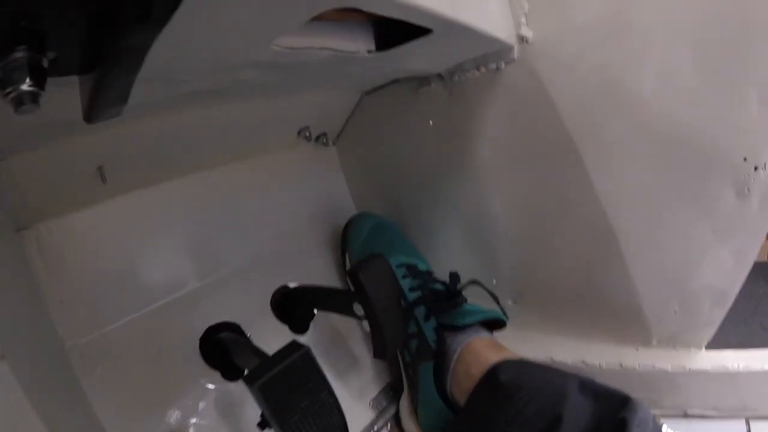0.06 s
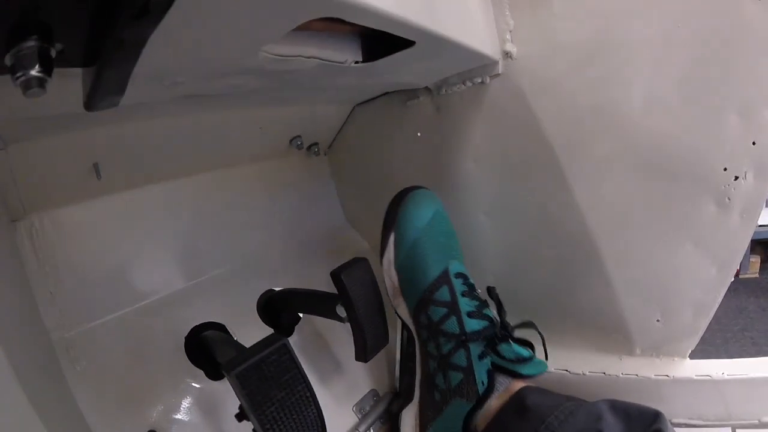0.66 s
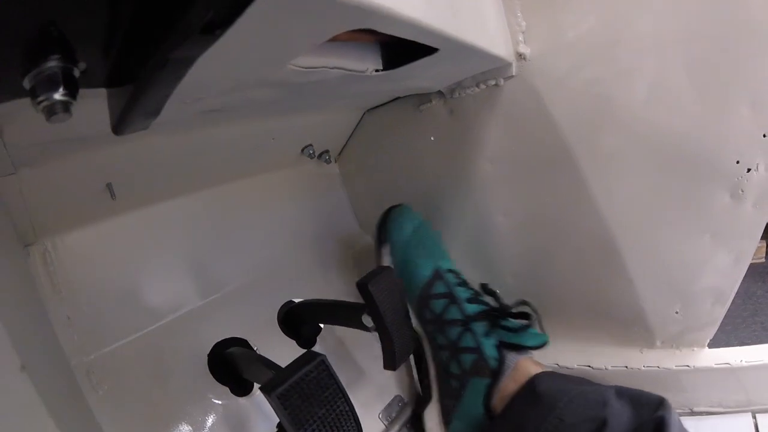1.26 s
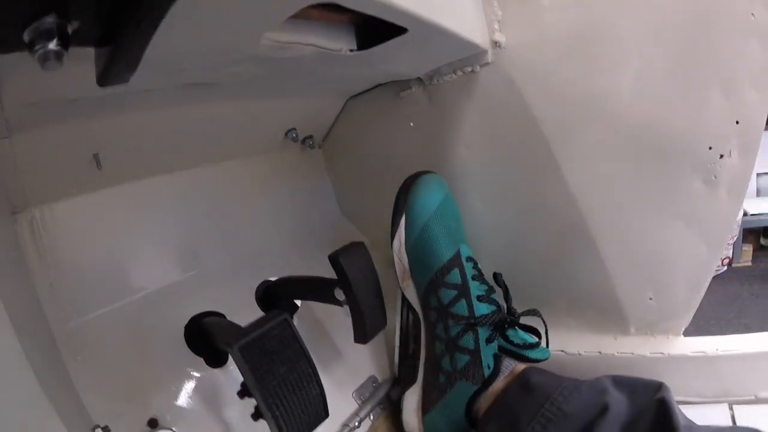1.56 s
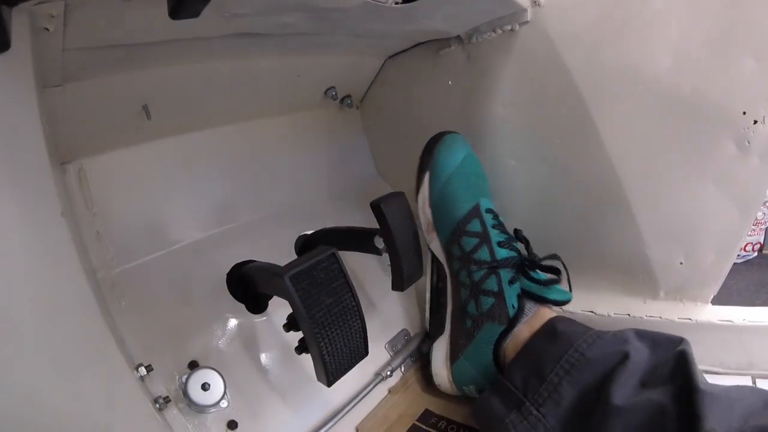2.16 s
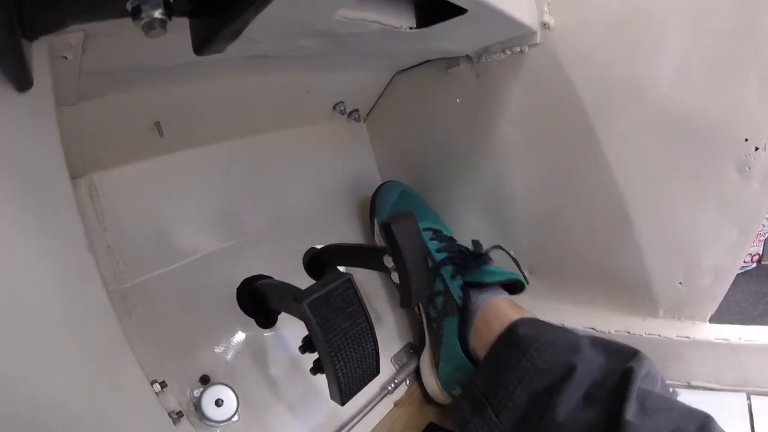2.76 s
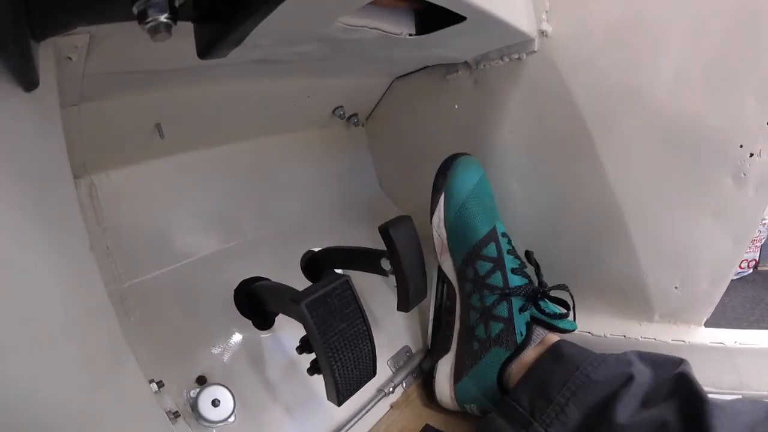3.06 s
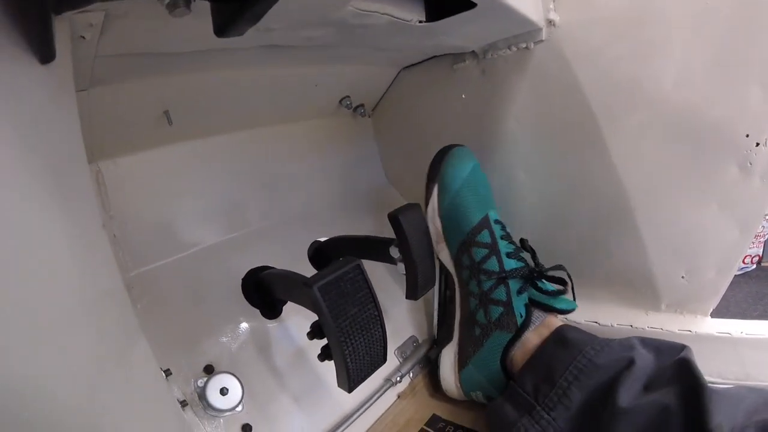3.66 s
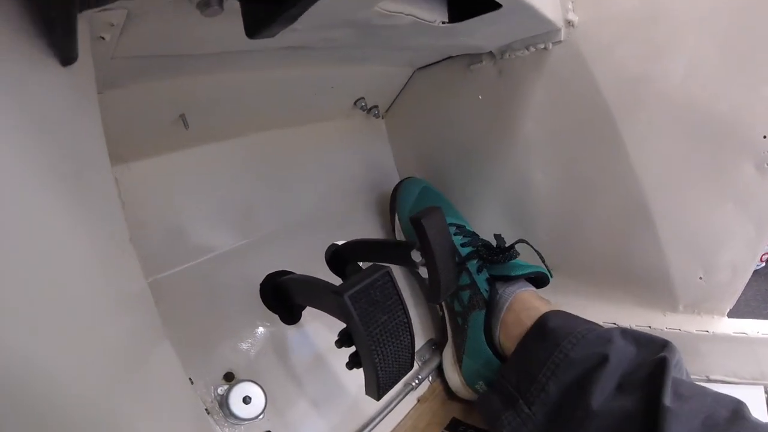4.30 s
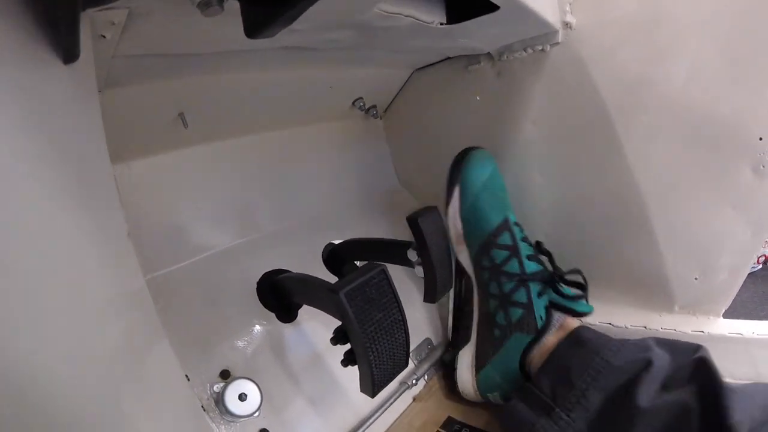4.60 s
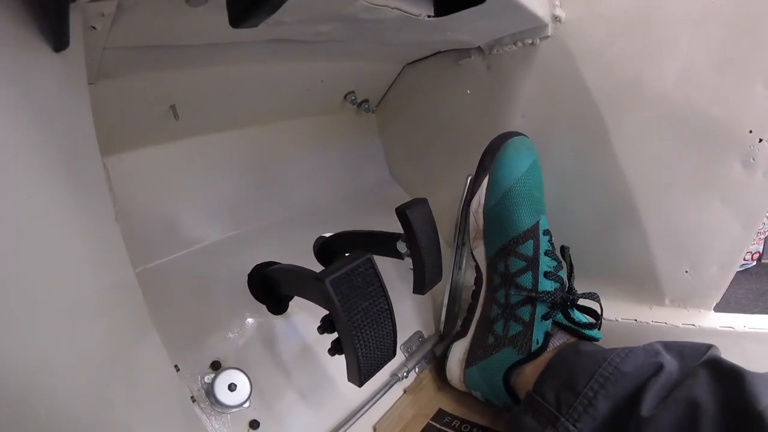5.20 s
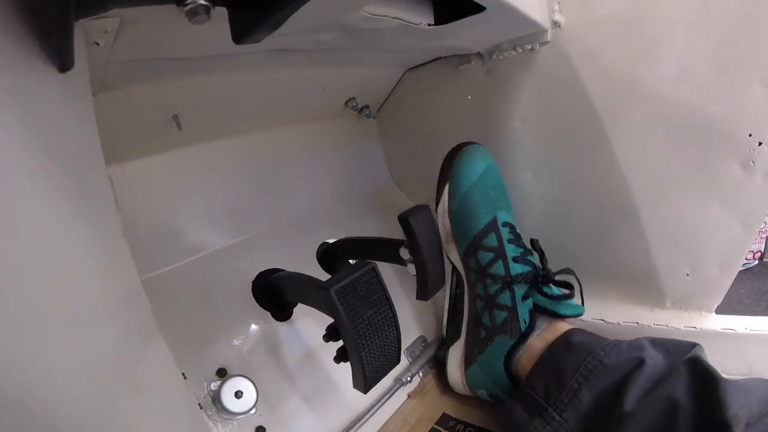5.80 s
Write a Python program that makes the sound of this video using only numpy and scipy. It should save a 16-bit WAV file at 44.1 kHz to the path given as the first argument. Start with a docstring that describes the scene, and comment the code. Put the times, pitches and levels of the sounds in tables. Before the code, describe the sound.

Close up in a bare metal car footwell, an accelerator pedal is pumped with irregular dull thumps and springy return thuds, the loudest near the start and at the end. A few sharper linkage clacks cut in, and the panels resonate briefly. Between blows come soft cable drag, trouser rustle, small ticks and short rubber scuffs, over faint microphone rumble and hiss with only a trace of garage echo.

```python
"""A garage, in the bare sheet-metal footwell of a standing car: a foot works the throttle pedal.
Again and again the sole thumps down, trouser cloth and cable rub, and the spring pulls the pedal back
with a thud; now and then the linkage clacks on its stop. Each blow rings the footwell panels.
Joints and cloth tick, rubber tread scuffs. The close microphone adds faint handling rumble and hiss."""
import sys
import numpy as np
from scipy import signal
from scipy.fft import rfft, irfft, next_fast_len
from scipy.io import wavfile
from scipy.ndimage import uniform_filter1d

SR = 44100
rng = np.random.default_rng(int(sys.argv[2]) if len(sys.argv) > 2 else 0)


def file_out(sig):
    """Save sig as 16-bit WAV at sys.argv[1]."""
    # one column per channel
    cols = np.atleast_2d(sig).T
    # limit, then scale
    lim = np.clip(cols, -1, 1)
    pcm = np.round(lim * 32767).astype(np.int16)
    wavfile.write(sys.argv[1], SR, pcm)


N = 257984


def undb(db):
    """Decibels to gain."""
    return 10 ** (np.asarray(db) / 20)


def unit(x):
    """Scale to an rms of 1."""
    return x / np.sqrt(np.mean(x ** 2))


def colour(x, spectrum):
    """Shape x with (freq_hz, level_db) points; rms 1."""
    hz, db = np.transpose(spectrum)
    size = next_fast_len(len(x), True)
    bins_hz = np.maximum(np.fft.rfftfreq(size, 1 / SR), 1)
    gain = undb(np.interp(np.log(bins_hz), np.log(hz), db))
    return unit(irfft(rfft(x, size) * gain, size)[:len(x)])


def butter(x, order, hz, kind="low"):
    """Butterworth filter."""
    return signal.sosfilt(signal.butter(order, hz, kind, fs=SR, output="sos"), x)


def fade(t, t60_s):
    """Free decay, 60 dB down after t60_s."""
    return np.exp(-np.log(1000) * t / t60_s)


def mode(t, hz, t60_s):
    """One freely decaying mode."""
    return fade(t, t60_s) * np.sin(2 * np.pi * hz * t)


def drift(rate_hz):
    """Smooth random drift, rms 1."""
    hold = int(SR / rate_hz)
    steps = np.repeat(rng.standard_normal(N // hold + 1), hold)
    return unit(uniform_filter1d(steps, hold)[:N])


def add(out, start_s, sound):
    """Mix a sound in at start_s."""
    i = int(start_s * SR)
    out[i:i + len(sound)] += sound[:N - i]


# microphone handling rumble: freq_hz, level_db
RUMBLE_SPECTRUM = [(12, -34), (20, -5), (71, -2.5), (128, -6.5), (154, -18.5), (364, -26), (446, -24.5),
                   (572, -26.5), (1590, -35.5), (2080, -34), (4500, -58.5), (5850, -71), (9900, -120)]
# microphone hiss: freq_hz, level_db
MIC_SPECTRUM = [(3500, -8.5), (5000, -15), (6000, -9), (6500, 4.5), (7100, -3.5), (9000, -7.5),
                (10500, -14), (13000, -13.5), (14200, -36)]

def background(rumble_db=-44.5, waver_db=1.37, hiss_db=-57):
    """Faint, wavering low rumble from handling the microphone, and its thin, steady hiss."""
    rumble = colour(rng.standard_normal(N), RUMBLE_SPECTRUM)
    rumble *= undb(rumble_db + waver_db * drift(rate_hz=4.5))
    return rumble + undb(hiss_db) * colour(rng.standard_normal(N), MIC_SPECTRUM)


def friction(spectrum, slips_per_s, spread_db, flutter_db, walls_db):
    """Tiny random slips, coming in flurries and smeared by the footwell walls; rms 1."""
    slips = (rng.random(N) < slips_per_s / SR) * rng.choice([-1, 1], N)
    sizes = undb(spread_db * np.minimum(rng.exponential(size=N), 5))
    t = np.arange(SR // 16) / SR
    walls = undb(walls_db) * rng.standard_normal(len(t)) * fade(t, 0.048)
    walls[0] = 1  # direct path
    flurries = slips * sizes * undb(flutter_db * drift(rate_hz=70))
    return colour(signal.fftconvolve(flurries, walls)[:N], spectrum)


# cable in its sleeve: freq_hz, level_db
CABLE_SPECTRUM = [(70, -22), (120, 0), (230, 2), (320, -8.5), (420, -13.5), (480, 3.5), (515, 8), (560, -5),
                  (610, -14), (720, -3), (870, -16), (2000, -56)]
# cable slides: start_s, length_s, level_db
CABLE_SLIDES = [(0.0, 0.088, -34.5), (0.259, 0.063, -33.5), (0.747, 0.29, -38), (1.239, 0.17, -39),
                (1.477, 0.033, -42), (2.224, .37, -36.5), (2.841, 0.17, -36), (3.753, 0.064, -34.5),
                (3.853, .19, -32.5), (4.435, 0.16, -33.5), (4.732, 0.076, -37.5)]

def cable(arch_db=2, gain_db=0.5):
    """The cable drags through its sleeve, fastest in mid travel, and the footwell hums with it."""
    envelope, t = np.zeros(N), np.arange(N) / SR
    for start_s, length_s, level_db in CABLE_SLIDES:
        off_centre = np.clip(2 * (t - start_s) / length_s - 1, -1, 1)
        onset = fade(np.maximum(start_s - t, 0), t60_s=0.11)
        tail = fade(np.maximum(t - start_s - length_s, 0), t60_s=0.3)
        envelope = np.maximum(envelope, undb(level_db - arch_db * off_centre ** 2) * onset * tail)
    drag = friction(CABLE_SPECTRUM, slips_per_s=2300, spread_db=1.53, flutter_db=-0.14, walls_db=-38.5)
    return undb(gain_db) * envelope * drag


# leg movements: peak_s, level_db, rise_s, fall_s, scrape_offset_db
LEG_STROKES = [(0.055, -36.5, 0.31, .1, -9), (0.391, -36.5, .22, 0.17, -3.5),
               (0.91, -39.5, 0.23, 0.23, -4.5), (1.038, -40.5, .1, 0.11, -3),
               (1.39, -38.5, 0.2, 0.12, -1.5), (1.54, -38.5, 0.26, 0.1, -3.5), (1.82, -52, 0.26, 0.14, 1.5),
               (2.11, -44.5, 0.18, 0.032, -1), (2.289, -41, 0.082, 0.12, -1), (2.45, -37, 0.39, 0.19, -3.5),
               (2.6, -45.5, 0.24, .15, -1), (2.97, -38, .18, .12, -2.5), (3.073, -29.5, 0.1, 0.094, -4),
               (3.29, -51.5, 0.26, 0.14, 1.5), (3.81, -39, 0.31, 0.26, -2.5),
               (3.934, -33.5, 0.11, 0.21, -5), (4.48, -46, .09, 0.11, -2), (4.68, -31, .25, .26, -4),
               (5.83, -36.5, 0.17, .2, 0.5)]

def strokes(scraping, range_db=20, roundness=1.157, stick_db=-63.5):
    """Rubbing envelope: peaks at each stroke's fastest moment, zero where the cloth sticks."""
    power, t = np.zeros(N), np.arange(N) / SR
    for peak_s, level_db, rise_s, fall_s, scrape_offset_db in LEG_STROKES:
        peak_db = level_db + (scrape_offset_db if scraping else 0)
        off_peak = np.maximum((peak_s - t) / rise_s, (t - peak_s) / fall_s)
        power += undb(peak_db - range_db * off_peak ** roundness) ** 2
    return np.maximum(np.sqrt(power) - undb(stick_db), 0)


# cloth hiss: freq_hz, level_db
CLOTH_HISS = [(1500, -0.5), (3000, -5.5), (4200, -5.5), (4900, -0.5), (5600, 1), (6050, -7), (6500, -1.5),
              (7500, -13), (9000, -8), (10500, -20), (11700, -31.5), (14000, -71)]
# cloth scrape: freq_hz, level_db
CLOTH_SCRAPE = [(300, -5), (700, -3), (950, -3.5), (1350, 8.5), (1700, -2), (2200, -6.5), (2450, -1.5),
                (2750, -1.5), (3300, -15.5), (3850, -8), (5000, -42), (9000, -46)]

def trousers(hiss_db=0.8, scrape_db=1.3, crease_db=-8):
    """Trouser cloth hisses, scrapes and creases with each stroke, silent when the leg rests."""
    hiss = friction(CLOTH_HISS, slips_per_s=6000, spread_db=3, flutter_db=2, walls_db=-24.5)
    scrape = friction(CLOTH_SCRAPE, slips_per_s=2500, spread_db=3, flutter_db=3.5, walls_db=-25.5)
    creases = friction(CLOTH_HISS, slips_per_s=60, spread_db=0, flutter_db=5, walls_db=-17.5)
    rustle = undb(hiss_db) * hiss + undb(crease_db) * creases
    return strokes(scraping=False) * rustle + strokes(scraping=True) * undb(scrape_db) * scrape


# sole letting go of the pedal: peak_s, half_length_s, level_db, pitch_hz
TREAD_SCUFFS = [(0.398, .014, -42, 5450), (2.335, 0.0044, -38, 5800), (3.064, 0.02, -27.5, 4650),
                (4.702, 0.012, -36, 5100)]

def scuffs():
    """Rubber tread chatters over the pedal face in short, narrow-band rasps."""
    out, t = np.zeros(N), np.arange(N) / SR
    spectrum = [(1000, 7), (5000, -3), (10000, -3), (12000, -16)]
    chatter = friction(spectrum, slips_per_s=5100, spread_db=1.5, flutter_db=5.5, walls_db=1)
    for peak_s, half_length_s, level_db, pitch_hz in TREAD_SCUFFS:
        rasp = unit(butter(chatter, 1, [0.93 * pitch_hz, 1.03 * pitch_hz], "band"))
        envelope = np.exp(-((t - peak_s) / half_length_s) ** 2 / 2)
        out += undb(level_db) * envelope * rasp
    return out


# clearest ticks of joints and cloth: start_s, level_db, pitch_hz
CLEAR_TICKS = [(0.0615, -20.5, 4960), (0.182, -33, 3230), (0.554, -33.5, 3600), (0.7564, -29.5, 5600),
               (1.145, -29.5, 5100), (1.3936, -19.5, 5200), (1.702, -34.5, 2000), (1.806, -34.5, 3460),
               (2.0355, -29, 4530), (2.115, -29, 4200), (2.598, -27, 6040), (2.646, -29.5, 1770),
               (3.0486, -16.5, 5150), (3.6336, -27, 4000), (3.7225, -23.5, 4900), (4.4627, -26, 6200),
               (4.5578, -19, 6400), (5.706, -29.5, 3420), (5.7595, -26, 5000), (5.822, -22.5, 4530)]

def ticks():
    """Joints and creasing cloth give short, broad snaps that reflect off the close walls."""
    out, t = np.zeros(N), np.arange(SR // 8) / SR
    direct, reflected = 0.5 * fade(t, 0.017), 0.059 * fade(t, 0.094)
    for start_s, level_db, pitch_hz in CLEAR_TICKS:
        noise = unit(butter(rng.standard_normal(len(t)), 1, [0.34 * pitch_hz, 1.18 * pitch_hz], "band"))
        snap = butter(noise * (direct + reflected), 6, 9500)
        add(out, start_s, undb(level_db) * snap)
    return out


# footwell panel modes: pitch_hz, t60_s, sole_db, return_db, stop_db
PANEL_MODES = [ (106.45, 0.27, -11.5, -2, -14.5), (128.4, 0.15, 0.5, 1.5, -17.5),
               (163.2, .13, -2, -42, -12.5), (202, 0.1, -36, 7, -48), (216.8, 0.35, -23.5, -9.5, -10.5),
               (235, 0.67, -25, -20, -17.5), (272, 0.51, -37, -35.5, -22.5), (326, 0.06, -41, -1.5, -12),
               (395.6, 0.12, -46, -31.5, -69), (437.4, 0.47, -29, -36, -51),
               (481, 0.16, -19.5, -18.5, -13.5), (508.5, 0.1, -34, -15.5, -8.5),
               (716, 0.049, -28, -18.5, -28), (815, 0.031, -31, -18, -10), (919, 0.13, -67, -27, -12),
               (1053, 0.062, -54, -23.5, -4), (1146, 0.2, -46, -36, -19.5), (1385, 0.15, -54, -41, -27),
               (1570, .07, -57, -38, -36), (1820, 0.11, -57, -36, -20), (2137, 0.12, -56, -48, -26),
               (2950, 0.085, -60, -52, -25), (3540, 0.067, -64, -60, -30)]
# crowded modes after a thud: freq_hz, level_db
THUD_WASH = [(60, -44), (110, 5.5), (220, 3.5), (330, -7), (500, -6), (700, -5.5), (1200, -7),
             (2500, -30.5), (8000, -30)]
# crowded modes after a clack: freq_hz, level_db
CLACK_WASH = [(80, -35), (200, -7), (500, -7), (1000, 1), (1500, -8), (2200, -6.5), (3500, -21.5),
              (5200, -7), (12000, -40)]

def blow(striker, hardness_hz, wash_db, bass_db, *, swell_cycles, low_t60_s, high_t60_s, garage_db):
    """One blow on the footwell: strong modes, a wash of crowded ones and the garage's faint answer."""
    t = np.arange(SR) / SR
    body = np.zeros(SR)
    for k, (pitch_hz, t60_s, sole_db, return_db, stop_db) in enumerate(PANEL_MODES):
        level_db = {"sole": sole_db, "return": return_db, "stop": stop_db}[striker]
        shelf_db = bass_db / (1 + (pitch_hz / 165) ** 6)  # the foot's weight feeds the lowest modes
        rolloff = 1 / np.sqrt(1 + (pitch_hz / hardness_hz) ** 4)  # soft contact misses the high ones
        swell = 1 - np.exp(-t * pitch_hz / swell_cycles)
        polarity = (-1) ** k  # neighbours swing against each other
        body += polarity * undb(level_db + shelf_db) * rolloff * swell * mode(t, pitch_hz, t60_s)
    noise = colour(rng.standard_normal(SR), CLACK_WASH if striker == "stop" else THUD_WASH)
    lows = butter(noise, 2, 450) * fade(t, low_t60_s)
    highs = butter(noise, 2, 450, "high") * fade(t, high_t60_s)
    garage = undb(garage_db) * noise * fade(t, 0.41)
    wash = butter(lows - highs + garage, 2, hardness_hz) / 2
    return body + undb(wash_db) * wash


# linkage on its stop: start_s, level_db, hardness_hz, wash_db, bass_db, knock_db, knock_hz
STOP_HITS = [(0.7545, -31, 5000, -1.5, -8, 12, 1480), (1.1041, -15, 2800, -2.5, -10, 1, 740),
             (2.6999, -10.5, 3100, -4, -3.5, 2, 755), (4.603, -27, 3000, 4, -13, 10.5, 1320)]

def linkage_clacks():
    """Metal on metal: a brief knock straight from the stop, then the panels ring."""
    out, t = np.zeros(N), np.arange(SR) / SR
    for start_s, level_db, *contact, knock_db, knock_hz in STOP_HITS:
        clack = blow("stop", *contact, swell_cycles=0.3, low_t60_s=0.44, high_t60_s=0.13, garage_db=-11.5)
        knock = undb(knock_db) * mode(t, knock_hz, t60_s=0.0057)
        add(out, start_s, undb(level_db) * (clack - knock))
    return out


# sole on pedal or floor: start_s, level_db, hardness_hz, wash_db, bass_db
SOLE_LANDINGS = [(0.076, -10.5, 696, -11, -4), (0.672, -10, 1490, -20.5, 2), (0.821, -32.5, 295, -4, 20.5),
                 (1.049, -10.5, 440, -8.5, -7), (2.059, -11, 770, -24, 6.5), (2.572, -20, 600, -13, -2.5),
                 (3.596, -19, 1000, -21, 8), (4.104, -22.5, 500, -9, -4.5), (4.385, -36, 923, -15, 15),
                 (5.8044, -1, 1330, -15, 1)]

def sole_thumps():
    """The rubber sole slaps, louder the harder the contact, and the panels thump."""
    out, t = np.zeros(N), np.arange(SR) / SR
    for start_s, level_db, hardness_hz, wash_db, bass_db in SOLE_LANDINGS:
        thump = blow("sole", hardness_hz, wash_db, bass_db,
                     swell_cycles=1.7, low_t60_s=0.24, high_t60_s=0.046, garage_db=-5)
        slap = hardness_hz / 6500 * mode(t, hz=550, t60_s=0.021)
        add(out, start_s, undb(level_db) * (thump - slap))
    return out


# return spring: pitch_hz, t60_s, level_db
SPRING_MODES = [(354, 0.7, -0.5), (377.2, 0.26, 6)]
# pedal reaching rest: start_s, level_db, hardness_hz, wash_db, bass_db, spring_db
PEDAL_RETURNS = [(0.3637, 1, 1490, -11.5, -9.5, -19), (1.396, -15, 388, -1.5, 0.5, -25.5),
                 (3.058, -5, 420, -9, -0.5, -29), (4.63, -10, 477, -2, 2.5, -19),
                 (4.858, -19, 330, -15.5, -11.5, -41)]

def return_thuds():
    """The pedal snaps back with a thud; its spring sings in two close modes that beat."""
    out, t = np.zeros(N), np.arange(SR) / SR
    spring = sum(undb(db) * mode(t, hz, t60_s) for hz, t60_s, db in SPRING_MODES)
    for start_s, level_db, *contact, spring_db in PEDAL_RETURNS:
        thud = blow("return", *contact,
                    swell_cycles=0.75, low_t60_s=0.53, high_t60_s=0.062, garage_db=-27)
        add(out, start_s, undb(level_db) * (thud + undb(spring_db) * spring))
    return out


def scene(port_hz=10800):
    """Mono mix; the microphone port dulls the top treble of blows, ticks and scuffs."""
    contacts = sole_thumps() + return_thuds() + linkage_clacks() + ticks() + scuffs()
    return (butter(contacts, 10, port_hz) + trousers() + cable() + background())[None]


def record(dry, top_hz=14200):
    """The input clips at full scale; a steep low-pass cuts the top."""
    lowpass = signal.ellip(8, 0.2, 70, top_hz, fs=SR, output="sos")
    return signal.sosfilt(lowpass, np.clip(dry, -1, 1))


dry = scene()
out = record(dry)
file_out(out)
```